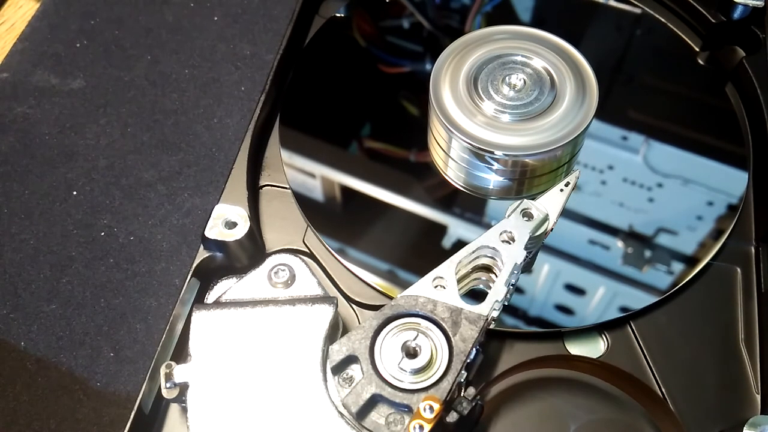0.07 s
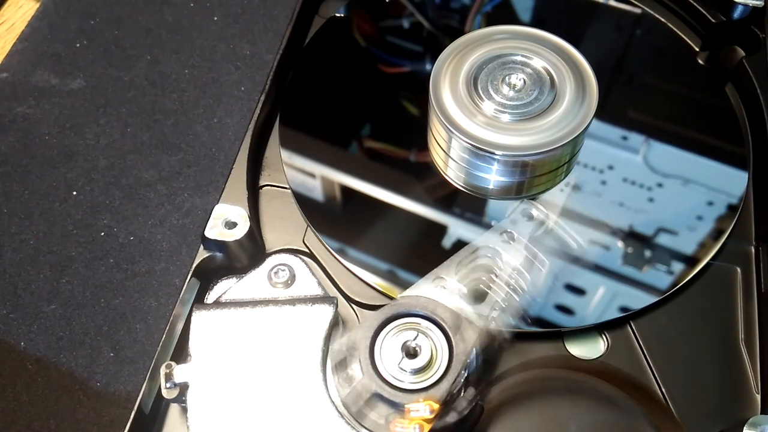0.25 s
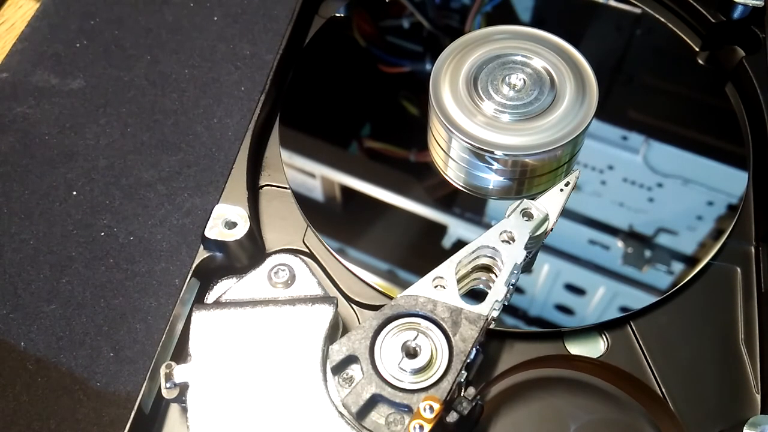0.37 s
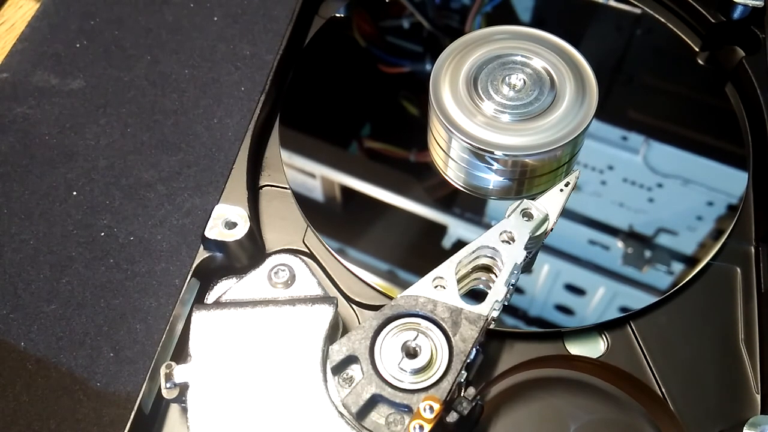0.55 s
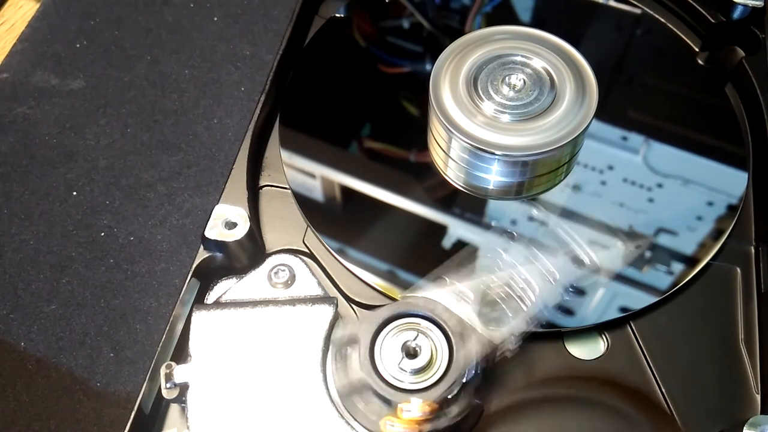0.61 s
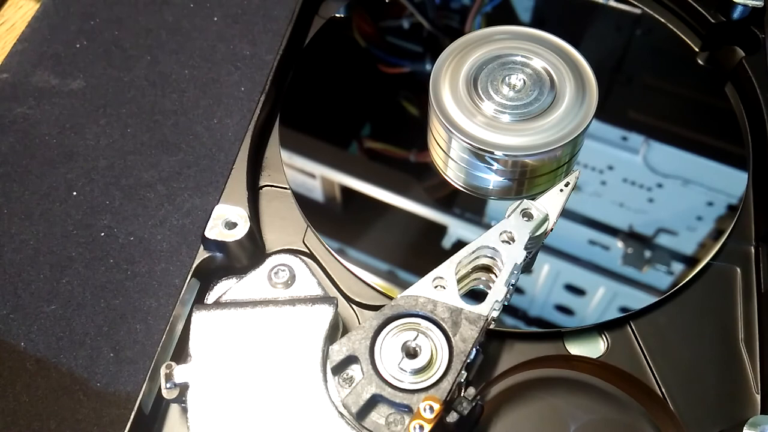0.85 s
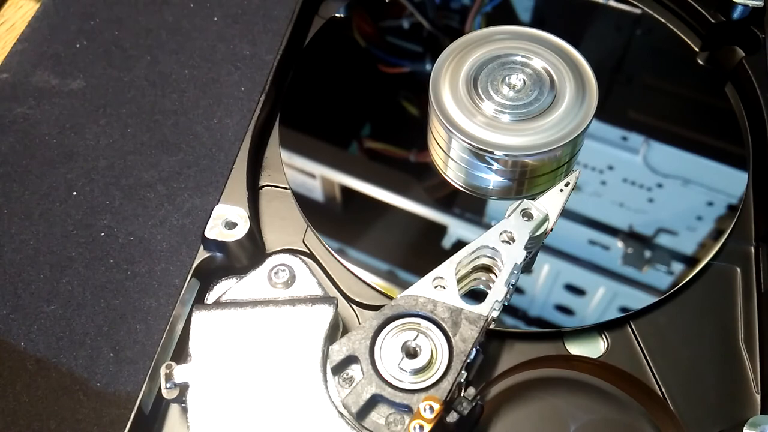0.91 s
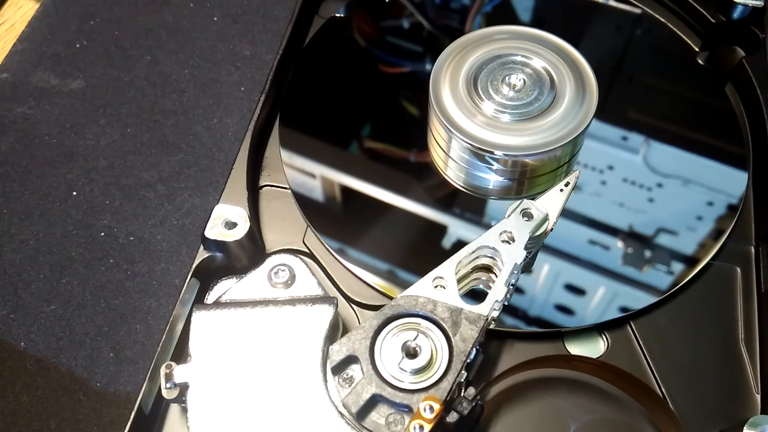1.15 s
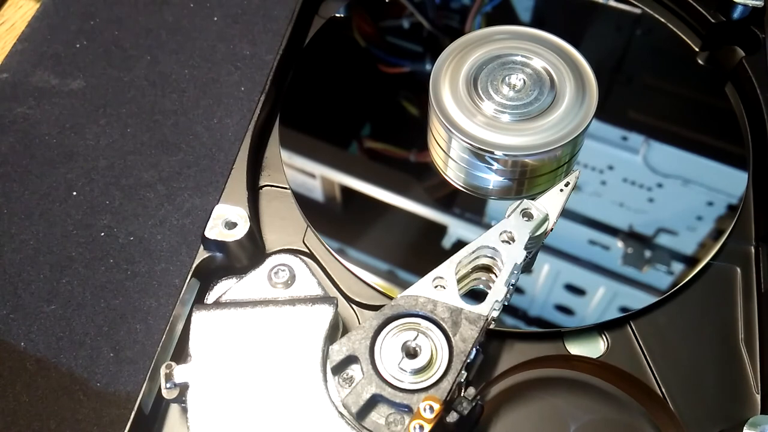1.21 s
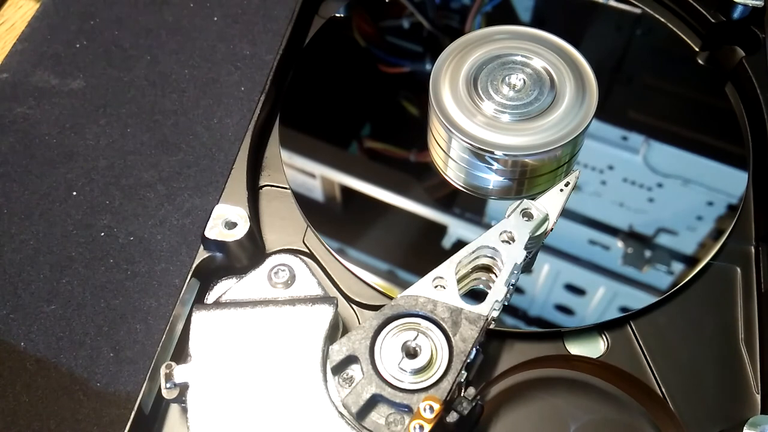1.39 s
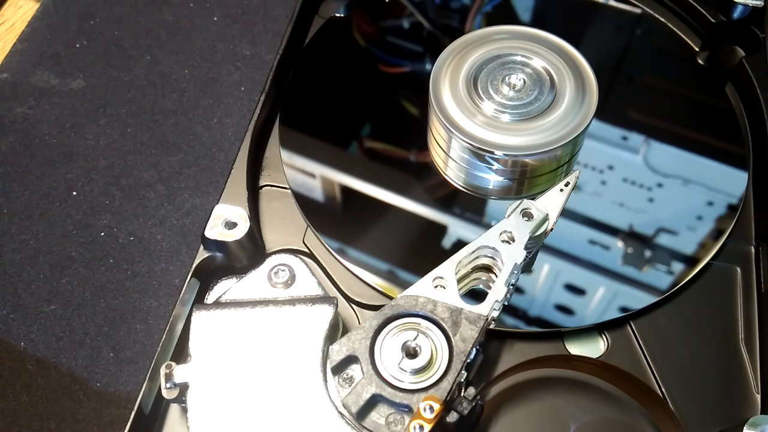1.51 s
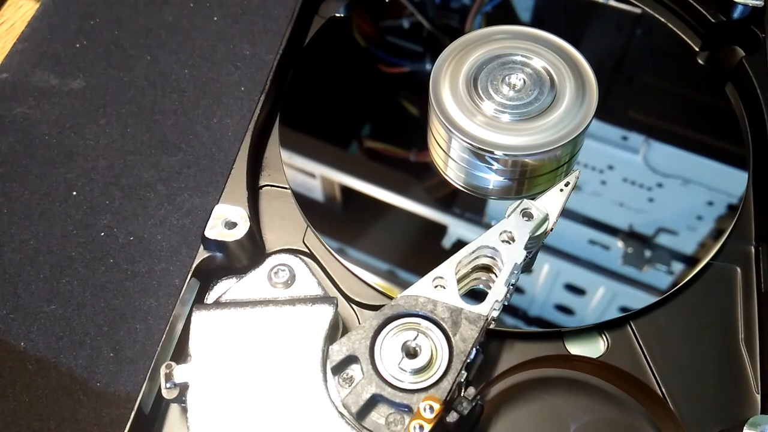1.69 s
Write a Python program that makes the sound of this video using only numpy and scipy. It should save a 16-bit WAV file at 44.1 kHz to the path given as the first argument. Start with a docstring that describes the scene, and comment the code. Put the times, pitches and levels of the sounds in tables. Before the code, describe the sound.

Four sharp hard drive clicks in two pairs, over a faint whir that winds down.

```python
"""In a quiet room, close to an opened, failing hard drive. The head arm twice slams against its outer
stop and snaps back to the hub; each impact excites the damped modes of arm and chassis. The spindle
whirs and whines, coasts once its power is cut, then brakes, and its pitch sinks with its speed.
A low rumble and a faint hum lie underneath; a fast limiter flattens the clicks."""
import sys
import numpy as np
from scipy import signal
from scipy.fft import rfft, irfft
from scipy.io import wavfile
from scipy.ndimage import uniform_filter1d, minimum_filter1d, map_coordinates

SR = 44100
rng = np.random.default_rng(int(sys.argv[2]) if len(sys.argv) > 2 else 0)


def waveform_to_disk(signal):
    """Save audio, clipped to [-1, 1], as 16-bit WAV at the path in sys.argv[1]."""
    frames = np.transpose(np.atleast_2d(signal))
    scaled = np.clip(frames, -1, 1) * 32767
    samples = np.round(scaled).astype(np.int16)
    wavfile.write(sys.argv[1], SR, samples)


N = 77175
T = np.arange(N) / SR

# Spectra of the room noise, the rustle and the casing's resonances: f/Hz, relative density/dB
RUMBLE_SPECTRUM = [(20, -26.5), (33, -12), (45, -1), (65, 0), (90, -7.5), (125, -7.5), (180, -15.5),
                   (260, -23.5), (400, -29.5), (600, -38), (900, -41.5)]
AIR_SPECTRUM = [(600, 13), (1200, -10.5), (2200, -5.5), (5000, -5), (9000, -29.5), (14000, -20)]
RUSTLE_SPECTRUM = [(5500, -10), (7100, 7), (7800, -6), (8600, -6.5), (9400, -6.5), (14000, -8)]
CASING_SPECTRUM = [(500, -5), (1200, -10), (2500, -14.5), (3100, -11), (3450, 0), (3850, 0.5), (4100, 2),
                   (4450, 0.5), (4850, 3.5), (5150, -9), (5550, -9.5), (6050, 1.5), (6700, -3.5),
                   (7150, -0.5), (7900, -4), (10000, -8), (14200, -9)]
# Envelopes of the room's rumble and the spindle's whir: t/s, gain/dB
RUMBLE_ENVELOPE = [(0, -48), (.1, -51), (.17, -51), (.25, -49.5), (.42, -50.5), (.5, -51.5), (.65, -48),
                   (.76, -52), (1.0, -51), (1.25, -51), (1.41, -48.5), (1.6, -52), (1.75, -53)]
WHIR_ENVELOPE = [(0, -58), (.2, -61), (.5, -57.5), (.7, -64), (.9, -60), (1.05, -61.5), (1.2, -62.5),
                 (1.35, -68), (1.5, -72), (1.75, -76.5)]
# Steady tones in the room: f/Hz, level/dB
HUM_TONES = [(311, -72), (399.5, -74)]
# Throbs in the rumble and swells of casing resonances: t/s, Gaussian width/s, f/Hz, level/dB
RUMBLE_THROBS = [(0.559, 0.019, 72, -44.5), (0.814, .011, 60, -49), (0.92, 0.012, 58, -42),
                 (0.955, 0.014, 55, -43.5), (1.08, 0.0096, 78, -46.5), (1.346, 0.018, 57, -42.5),
                 (1.544, 0.01, 61, -43.5)]
CASING_SWELLS = [(0.999, .06, 4970, -75), (1.172, 0.054, 5800, -73.5), (1.188, 0.012, 3450, -69.5),
                 (1.29, 0.018, 3460, -74.5), (1.325, .02, 4780, -72), (1.383, 0.025, 4420, -69.5),
                 (1.587, 0.072, 4380, -77), (1.3, .15, 7100, -87.5), (1.497, .2, 5820, -89),
                 (1.553, 0.054, 8640, -89.5)]
# Partials of spindle and bearings: f at full speed/Hz, level/dB, decay time constant in coasting/s
WHINE_PARTIALS = [(3838, -75, .25), (4683, -71.5, .17), (4770, -80, .3), (4856, -78, .25), (6158, -76, .12),
                  (6239, -73, .1), (6632, -68, .4), (7101, -70, .22), (7574, -80, .2), (8930, -83, .6),
                  (9500, -82, .05), (11267, -81, .03), (11612, -76, .03), (12478, -80, .03),
                  (14212, -83, .03)]
# Blows of the arm on the outer stop and the hub, and its chatter on the stop: t/s, relative level/dB
OUTER_IMPACTS = [(0.2153, 0.5), (0.236, -26.5), (0.253, -26), (0.6939, 1)]
HUB_IMPACTS = [(0.3692, -1), (0.3741, -1.5), (0.7662, 1.5), (0.7715, -6.5)]
CHATTER_IMPACTS = [(0.2426, -37.5), (0.2497, -44.5), (0.258, -48), (0.262, -50)]
# Modes of arm and chassis: f/Hz, T60/s, rise/s, gain from the outer stop/dB, gain from the hub/dB
ARM_MODES = [(660, 0.092, .002, -56.5, -52), (1018, 0.066, .003, -35, -42),
             (1069.5, 0.044, .003, -37.5, -34.5), (1654, 0.069, 0.00084, -39, -60),
             (2172, 0.07, .002, -39, -54), (3340, 0.013, .002, -44, -41.5),
             (3525, .018, 0.003, -19.5, -20.5), (3768, .016, 0.0046, -17.5, -14.5),
             (5890, .022, 0.0012, -63, -49), (6236, 0.044, .0004, -21, -29.5),
             (6302, 0.016, 0.0012, -8, -6.5), (6390, .014, .0004, -31.5, -23),
             (6600, 0.023, 0.00076, -36, -36), (7004, 0.022, .0004, -19.5, -19),
             (7030, .025, .0004, -43, -40.5)]
# Spectra of the arm's contact noises: f/Hz, relative density/dB
OUTER_SPECTRUM = [(300, -22), (800, -3.5), (1100, 6.5), (1350, -3), (1700, 1), (2500, -7.5), (3600, 7),
                  (4400, -9.5), (5300, -12), (6300, 16.5), (7200, 8.5), (8400, -15), (9600, 1.5),
                  (11000, -18.5), (14000, -6.5)]
HUB_SPECTRUM = [(300, -22.5), (700, -11.5), (1100, -6), (1600, -14.5), (2500, -14), (3600, 2.5),
                (4500, -7.5), (5400, -7.5), (6400, 10), (7400, 3), (8600, -11.5), (11000, -22),
                (12300, -11), (14000, -21)]
CHATTER_SPECTRUM = [(700, -37), (1000, 6), (1300, -9), (1650, 6), (2100, -12), (2600, -15), (3700, -0.5),
                    (4600, -14), (6300, -7), (8000, -13), (14000, -25)]
SNAP_SPECTRUM = [(7500, -11.5), (9500, 5.5), (11000, -6.5), (12400, 6), (14000, -0.5)]

SPIN_HZ, POWER_OFF_S, BRAKE_S = 86.66, .72, 1.085
COAST_PER_S, BRAKE_PER_S = .113, .8  # decay rates of the speed
SHARP_RISE_S, SOFT_RISE_S = .00027, .003
LIMIT_DB, LIMIT_WINDOW_S = -13.5, .0022


def undb(db):
    """Amplitude ratio of a level."""
    return 10 ** (np.asarray(db) / 20)


def envelope(points):
    """Gain interpolated between (t/s, gain/dB) points."""
    return undb(np.interp(T, *np.array(points).T))


def colour(x, spectrum):
    """Spectral shaping by (f/Hz, gain/dB) points, scaled to rms 1."""
    hz, db = np.array(spectrum).T
    f = np.maximum(np.fft.rfftfreq(N, 1 / SR), 1)
    skirts = np.minimum(f / hz[0], 1) ** 2 * np.minimum(hz[-1] / f, 1) ** 2
    shaped = irfft(rfft(x) * undb(np.interp(np.log(f), np.log(hz), db)) * skirts, N)
    return shaped / np.sqrt(np.mean(shaped ** 2))


def noise(spectrum):
    """Filtered Gaussian noise of rms 1."""
    return colour(rng.standard_normal(N), spectrum)


def wander(rate_hz):
    """Low-pass random modulation with a spread near 1."""
    hold = int(SR / rate_hz)
    steps = np.repeat(rng.standard_normal(N // hold + 1), hold)
    return 1.3 * uniform_filter1d(uniform_filter1d(steps, hold), hold)[:N]


def tone(hz, t=T):
    """Sinusoid of rms 1 and random phase."""
    return np.sqrt(2) * np.sin(2 * np.pi * (hz * t + rng.random()))


def swell(centre, width):
    """Gaussian envelope in time."""
    return np.exp(-((T - centre) / width) ** 2 / 2)


def ring(age, rise, t60):
    """Build-up and exponential decay of a damped vibration; times in seconds."""
    age = np.maximum(age, 0)
    return (1 - np.exp(-(age / rise) ** 2)) * np.exp(-np.log(1000) * age / t60)


def room():
    """Superposition of a throbbing rumble, faint air noise and a wavering hum."""
    throbs = sum(undb(db) * swell(at, width) * tone(hz) for at, width, hz, db in RUMBLE_THROBS)
    hum = sum(undb(db + 3.1 * wander(6.6)) * tone(hz) for hz, db in HUM_TONES)
    rumble = noise(RUMBLE_SPECTRUM) * envelope(RUMBLE_ENVELOPE)
    return rumble + throbs + undb(-73.5) * noise(AIR_SPECTRUM) + hum


def rustle():
    """A faint burst of treble noise decays exponentially near the end."""
    return undb(-75) * ring(T - 1.51, SOFT_RISE_S, t60=.4) * noise(RUSTLE_SPECTRUM)


def casing(bandwidth_hz=100):
    """Resonance: narrow bands of the casing swell as the slowing bearings pass through them."""
    out = np.zeros(N)
    for at, width, hz, db in CASING_SWELLS:
        phase = 2 * np.pi * hz * T
        band = wander(bandwidth_hz) * np.sin(phase) + wander(bandwidth_hz) * np.cos(phase)
        out += undb(db) * swell(at, width) * band
    return out


def bearing_whir(revolutions, run_down):
    """Periodic forcing: roughness repeats every turn and drives the casing, duller as it slows."""
    harmonics = np.exp(2j * np.pi * rng.random(257)) * undb(7 * rng.uniform(-1, 1, 257))
    track = irfft(harmonics, 2048)
    roughness = map_coordinates(track, [revolutions % 1 * len(track)], mode="grid-wrap")
    hiss = undb(-9.5) * noise(CASING_SPECTRUM)
    whir = undb(-4 - .5 * run_down) * colour(roughness, CASING_SPECTRUM) + hiss
    treble = signal.sosfiltfilt(signal.butter(4, 7100, "high", fs=SR, output="sos"), whir)
    return envelope(WHIR_ENVELOPE) * (whir - .77 * run_down * treble)


def spindle():
    """Rotational harmonics: the frequencies of whir and whine follow the exponentially falling speed."""
    coasting, braking = np.maximum(T - POWER_OFF_S, 0), np.maximum(T - BRAKE_S, 0)
    speed = np.exp(-COAST_PER_S * coasting - BRAKE_PER_S * braking)  # 1 at full speed
    rotor_time = np.cumsum(speed) / SR
    run_down = np.clip(coasting / (BRAKE_S - POWER_OFF_S), 0, 1)
    whir = bearing_whir(rotor_time * SPIN_HZ, run_down)
    whine = sum(undb(db + 2 * wander(7.3)) * np.exp(-coasting / decay) * tone(hz, rotor_time)
                for hz, db, decay in WHINE_PARTIALS)
    return whir + whine * np.exp(-braking / .05)


def arm_slide():
    """Friction: the arm tip rubs for a few milliseconds around each blow on the outer stop."""
    contact = sum(undb(db - 36) * np.exp(-np.abs(T - at) / .0013) for at, db in OUTER_IMPACTS)
    return contact * noise(OUTER_SPECTRUM)


def arm_knocks(impacts, mode_gains_db, spectrum, tail_db):
    """Impulse response: each blow cracks, rings the modes and scatters through casing and room."""
    out, t = np.zeros(N), T[:N // 4]
    modes = sum(undb(db) * ring(t, rise, t60) * np.sin(2 * np.pi * hz * t)
                for (hz, t60, rise, _, _), db in zip(ARM_MODES, mode_gains_db))
    for at, db in impacts:
        crack = undb(-27) * ring(T - at, SHARP_RISE_S, t60=.027)
        tail = undb(tail_db) * ring(T - at, SOFT_RISE_S, t60=.085)
        reverberation = undb(-51.5) * ring(T - at, SOFT_RISE_S, t60=.55)
        blow = (crack + tail + reverberation) * noise(spectrum)
        onset = int(at * SR)
        blow[onset:onset + len(t)] += modes
        out += undb(db) * blow
    return out


def head_arm():
    """Impact and rebound: the arm snaps brightly at both ends of its swing and chatters on the stop."""
    outer_db, hub_db = np.array(ARM_MODES).T[-2:]
    outer = arm_knocks(OUTER_IMPACTS, outer_db, OUTER_SPECTRUM, tail_db=-40.5)
    hub = arm_knocks(HUB_IMPACTS, hub_db, HUB_SPECTRUM, tail_db=-46)
    snap = sum(undb(db - 29) * ring(T - at, SHARP_RISE_S, t60=.0078)
               for at, db in OUTER_IMPACTS + HUB_IMPACTS)
    chatter = sum(undb(db) * ring(T - at, SOFT_RISE_S, t60=.037) for at, db in CHATTER_IMPACTS)
    return outer + hub + snap * noise(SNAP_SPECTRUM) + chatter * noise(CHATTER_SPECTRUM) + arm_slide()


def scene():
    """Mid-side stereo: only the drive's top treble differs a little between the ears."""
    drive = head_arm() + spindle() + casing() + rustle()
    side = undb(-25.5) * signal.sosfilt(signal.butter(12, 8600, "high", fs=SR, output="sos"), drive)
    return drive + room() + side * np.array([[1], [-1]])


def record(dry):
    """Peak limiting flattens the clicks; a steep low-pass filter cuts the top."""
    window = int(LIMIT_WINDOW_S * SR)
    gain = np.minimum(1, undb(LIMIT_DB) / (np.abs(dry).max(axis=0) + 1e-9))
    gain = uniform_filter1d(minimum_filter1d(gain, window), window)
    return signal.sosfilt(signal.ellip(10, .2, 70, 14350, fs=SR, output="sos"), dry * gain)


dry = scene()
out = record(dry)
waveform_to_disk(out)
```